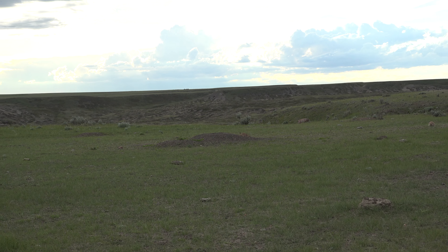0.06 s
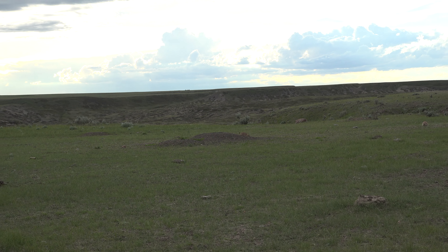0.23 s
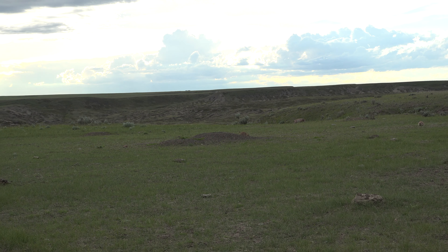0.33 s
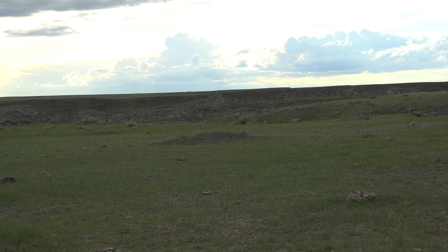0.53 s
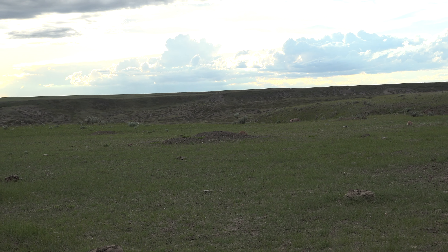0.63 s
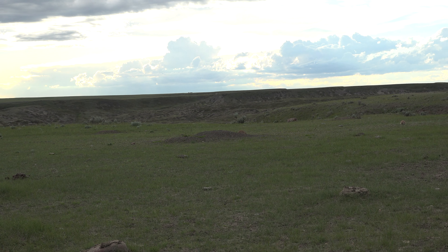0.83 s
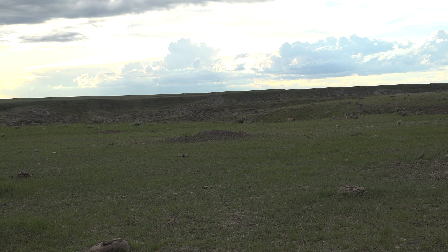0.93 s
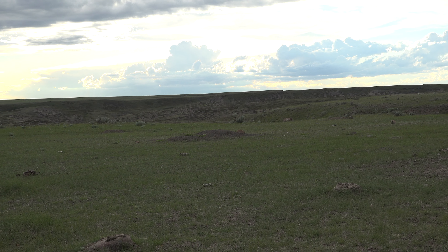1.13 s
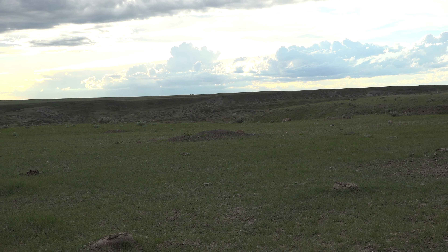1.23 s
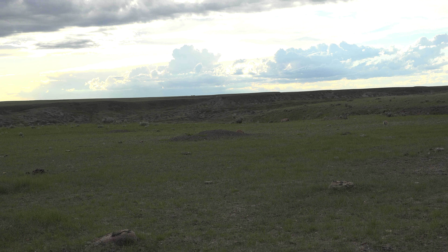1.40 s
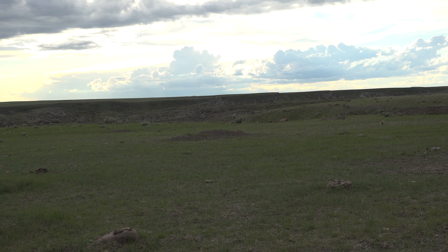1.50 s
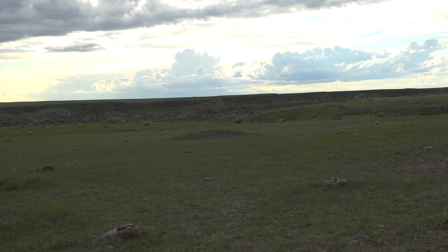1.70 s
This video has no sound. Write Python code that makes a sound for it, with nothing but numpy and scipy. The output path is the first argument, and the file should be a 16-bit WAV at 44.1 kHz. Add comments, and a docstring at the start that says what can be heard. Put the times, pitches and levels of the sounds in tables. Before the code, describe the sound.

A prairie dog barks on open grassland at about 0.2, 0.8 and 1.4 seconds, each short squeak arching in pitch, ringing briefly and a little quieter than the last. A high cricket chirps five times, roughly every 0.4 seconds. A distant bird whistles twice, very faintly, in the first half second. Wind buffets the microphone, mostly on the left, strongest from 1.1 to 1.5 seconds, over soft hum and hiss.

```python
"""Prairie dog on open grassland

A prairie dog barks three times: short squeaks that arch in pitch and trail off in a brief ringing.
A cricket chirps with its wings, four strokes at a time, and a far bird whistles faintly twice.
Gusts of wind buffet the microphone, mostly on the left, over a soft steady hum, hiss and far crickets."""
import sys
import numpy as np
from scipy import signal
from scipy.fft import rfft, irfft
from scipy.io import wavfile

SR = 44100
rng = np.random.default_rng(int(sys.argv[2]) if len(sys.argv) > 2 else 0)


def int16_out(signal):
    """Quantize to a 16-bit WAV file."""
    q = np.round(np.clip(np.atleast_2d(signal).T, -1, 1) * 32767)
    wavfile.write(sys.argv[1], SR, q.astype(np.int16))


N = 77175

# The tone of the hum and hiss. Each row: frequency in Hz, relative level in dB.
AIR_SPECTRUM = [(20, -22.5), (45, -9.5), (90, 3), (170, -7), (220, -1), (280, 1.5), (370, -16.5),
                (460, -2.5), (580, -22.5), (1000, -20), (1150, -18), (1350, -22.5), (1620, -28.5),
                (1800, -14), (2080, -26.5), (4000, -26), (7800, -27), (9500, -31.5), (13500, -36),
                (15700, -40.5)]
# How alike the air sounds left and right. Each row: frequency in Hz, likeness (1 is identical).
AIR_LIKENESS = [(50, 0.98), (500, 0.84), (1800, 0.79), (3000, 0.99), (8000, 0.18), (12000, 0.57)]
# Each row: start in seconds, seconds before it fades, level in dB, dB louder on the left.
WIND_GUSTS = [(0.703, 0.029, -49.5, 9.5), (0.759, 0.069, -51.5, 2.5), (1.075, .03, -53, -11),
              (1.144, 0.077, -36, 7.5), (1.222, 0.083, -43, 16), (1.331, 0.043, -39, 26),
              (1.375, 0.062, -40, 7), (1.443, 0.083, -48.5, 12)]
# The tone of a gust. Each row: frequency in Hz, relative level in dB.
GUST_SPECTRUM = [(15, -55), (25, -25), (43, -16.5), (86, 1.5), (214, -5), (271, -10.5), (344, -27),
                 (448, -22), (700, -53.5), (910, -89), (1540, -120)]
# Each row: start and length in seconds, first and last pitch in Hz, level in dB.
BIRD_WHISTLES = [(0.077, .075, 3555, 3694, -67.5), (0.377, .16, 2112, 1870, -69.5)]
# Each row: start in seconds, level in dB.
CRICKET_CHIRPS = [(0.062, -40), (0.465, -41), (0.880, -40), (1.204, -38.5), (1.579, -39.5)]
# One chirp. Each row: delay and length in seconds, starting pitch in Hz, dB added to the chirp's level.
WING_STROKES = [(0, 0.015, 5060, -10), (.029, 0.019, 5313, -4), (0.069, .021, 5413, -4),
                (0.109, 0.02, 5354, -4)]
# Each row: start and length in seconds, top pitch in Hz, level in dB, then the levels of
# harmonics 1, 3 and 4 in dB compared with harmonic 2. A harmonic is a whole multiple of the pitch.
DOG_BARKS = [(0.2259, .058, 1823, -27.5, -16.5, -8.5, -46), (0.7523, 0.064, 1818, -30, -17.5, -4.5, -20),
             (1.3844, .057, 1789, -32.5, -21.5, -9, -28.5)]
# Quick repeats after each call. Each row: delay in seconds, level in dB compared with the call.
RING_REPEATS = [(.0057, -12), (.0172, -7.5), (0.035, -18)]


def amp(db):
    """Turns decibels into a number to multiply by."""
    return 10 ** (np.asarray(db) / 20)


def evened(x):
    """Scales a sound to an average (rms) strength of 1."""
    return x / np.sqrt(np.mean(x ** 2) + 1e-20)


def look_up(table, hz):
    """Reads between a table's rows on a log-frequency scale."""
    row_hz, value = np.transpose(table)
    return np.interp(np.log(hz + 1), np.log(row_hz + 1), value)


def add(mix, start_s, sound):
    """Mixes a sound in at its start time."""
    part = mix[..., max(round(start_s * SR), 0):][..., :sound.shape[-1]]
    part += sound[..., :part.shape[-1]]


def pan(db):
    """Left and right gains: positive db leans left, negative leans right."""
    gains = amp([[db / 2], [-db / 2]])
    return gains / gains.mean()


def noise(shape):
    """Noise whose strength at each frequency follows shape(hz)."""
    white = rfft(rng.standard_normal(N))
    return evened(irfft(white * shape(np.fft.rfftfreq(N, 1 / SR)), N))


def wobble(hz, size):
    """Random wavering, mostly slower than hz."""
    return noise(lambda f: 1 / (1 + (f / hz) ** 4))[:size]


def ramp(progress):
    """A smooth step from 0 to 1."""
    return np.sin(np.pi / 2 * np.clip(progress, 0, 1))


def ringing(sound, tail_gap_s=0.0024, tail_s=0.22):
    """Adds a few quick repeats and a short tail that ring after each call, like a recorder's hum filter."""
    t = np.arange(SR // 2) / SR
    tail = rng.choice([-1., 1.], (2, len(t)))
    tail *= rng.random((2, len(t))) < 2000 / SR  # about 2000 tiny repeats a second
    tail *= ramp((t - tail_gap_s) / tail_gap_s) * amp(-60 * t / tail_s)
    mid, side = amp(-5.5) * tail / np.linalg.norm(tail, axis=1, keepdims=True)
    mid[0] += 1  # the call itself
    for delay, db in RING_REPEATS:
        mid[round(delay * SR)] += amp(db)
    side *= amp(-12.5)  # left and right stay nearly alike
    return signal.fftconvolve(sound[None], np.array([mid + side, mid - side]), axes=1)[:, :N]


def air():
    """A steady low hum and hiss."""
    hz = np.fft.rfftfreq(N, 1 / SR)
    left, unrelated = rfft(rng.standard_normal((2, N)))
    likeness = np.clip(look_up(AIR_LIKENESS, hz), -1, 1)
    right = likeness * left + np.sqrt(1 - likeness ** 2) * unrelated
    return evened(irfft(np.array([left, right]) * amp(look_up(AIR_SPECTRUM, hz)), N))


def far_crickets(pitch_hz=4880, width_hz=260):
    """Many far crickets blur into a thin band of noise."""
    return noise(lambda hz: np.exp(-.5 * ((hz - pitch_hz) / width_hz) ** 2))


def wind(rise_s=0.0089, fall_s=0.031):
    """Air swirls at the microphone, making a short low rumble with each gust."""
    out = np.zeros((2, N))
    rumble = lambda hz: amp(look_up(GUST_SPECTRUM, hz)) / (1 + (hz / 600) ** 6)
    for start, length, level_db, pan_db in WIND_GUSTS:
        t = np.arange(0, length + fall_s, 1 / SR)
        mid = evened(noise(rumble)[:len(t)])
        side = amp(-11.5) * evened(noise(rumble)[:len(t)])
        swell = ramp(t / rise_s) * ramp((t[-1] - t) / fall_s) ** 2
        add(out, start, amp(level_db) * pan(pan_db) * swell * np.array([mid + side, mid - side]))
    return out


def far_bird():
    """A far bird whistles soft, gliding notes."""
    out = np.zeros(N)
    for start, length, first_hz, last_hz, level_db in BIRD_WHISTLES:
        hz = np.linspace(first_hz, last_hz, int(length * SR))
        tone = np.sqrt(2) * np.sin(2 * np.pi * np.cumsum(hz) / SR)
        add(out, start, amp(level_db) * np.hanning(len(tone)) * tone)
    return out


def cricket(sag_hz_per_s=33300, fade_s=0.0053):
    """Each wing stroke makes a pure tone whose pitch sags as the wing slows."""
    out = np.zeros(N)
    for start, chirp_db in CRICKET_CHIRPS:
        for delay, length, first_hz, stroke_db in WING_STROKES:
            t = np.arange(0, length, 1 / SR)
            hz = (first_hz - sag_hz_per_s * t) * (1 + 0.0056 * wobble(480, len(t)))
            tone = np.sqrt(2) * np.sin(2 * np.pi * np.cumsum(hz) / SR)
            swell = ramp(t / fade_s) * ramp((length - t) / fade_s)
            add(out, start + delay, amp(chirp_db + stroke_db) * swell * tone)
    return out


def prairie_dog(peak_s=0.01594, attack_s=0.013, release_s=0.0048):
    """Each bark is four harmonics: the second is loudest, the others come later and fade sooner."""
    out = np.zeros(N)
    for start, length, top_hz, level_db, *harmonic_dbs in DOG_BARKS:
        t = np.arange(0, length, 1 / SR)
        rise = ramp(t / peak_s)
        sag = np.clip((t - peak_s) / (length - peak_s), 0, 1)
        hz = top_hz * (.83 + .17 * rise - .23 * sag ** 1.145)  # leaps to the top, then sinks
        hz *= 1 + 0.0087 * wobble(430, len(t))
        phase = 2 * np.pi * np.cumsum(hz) / SR
        swell = ramp(t / attack_s) * amp(-12 * sag ** 2)
        others = sum(amp(db) * np.sin(k * phase) for k, db in zip((1, 3, 4), harmonic_dbs))
        voice = np.sqrt(2) * (np.sin(2 * phase) + swell * others)
        rasp = 1 + amp(-18) * wobble(680, len(t))
        ending = ramp((length - t) / release_s)
        add(out, start, amp(level_db) * swell * ending * rasp * voice)
    return out


def scene():
    """Mixes air and wind with the animals, which sit a little to the right."""
    barks, chirps, whistles = prairie_dog(), cricket(), far_bird()
    animals = pan(-3.5) * ringing(barks + whistles) + pan(-5) * ringing(chirps)
    background = wind() + amp(-57) * pan(1) * air() + amp(-71) * pan(-5) * far_crickets()
    return background + animals


def record(dry, cutoff_hz=15700):
    """Cuts away the very highest treble."""
    low_pass = signal.firwin(511, cutoff_hz, window=("kaiser", 9), fs=SR)
    return signal.oaconvolve(dry, low_pass[None], "same")


dry = scene()
out = record(dry)
int16_out(out)
```